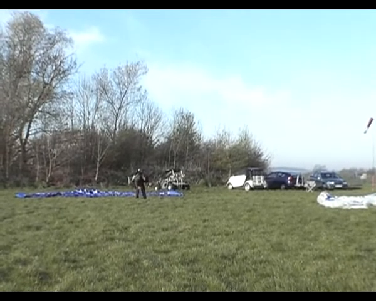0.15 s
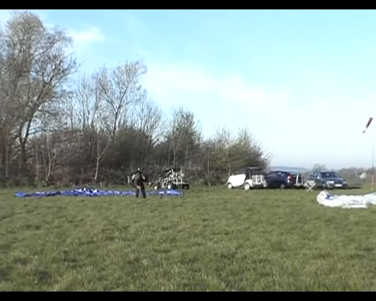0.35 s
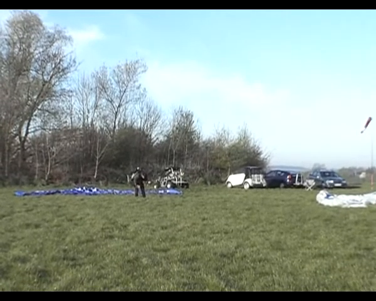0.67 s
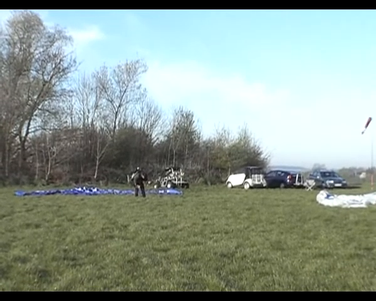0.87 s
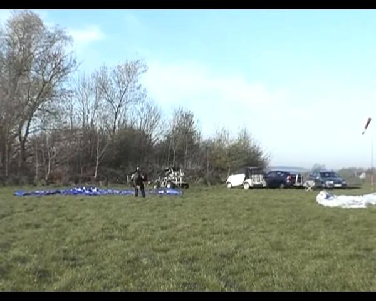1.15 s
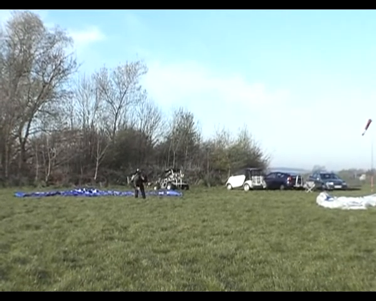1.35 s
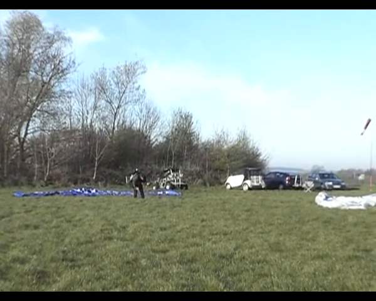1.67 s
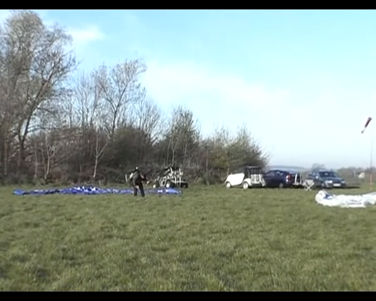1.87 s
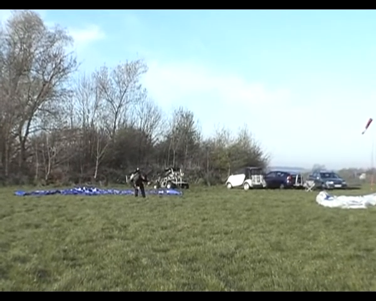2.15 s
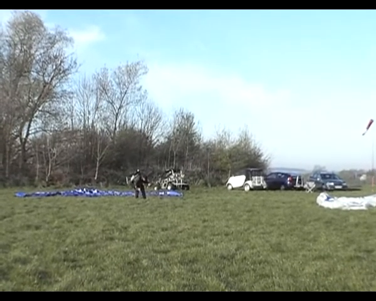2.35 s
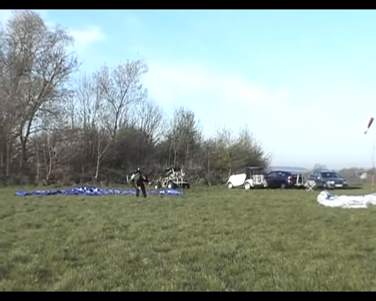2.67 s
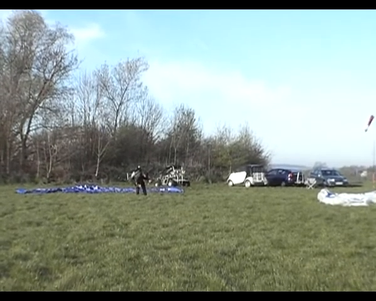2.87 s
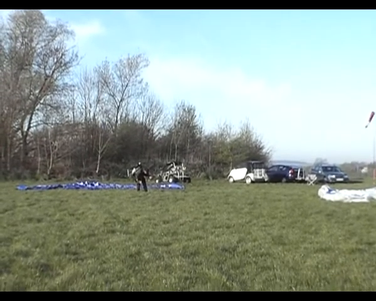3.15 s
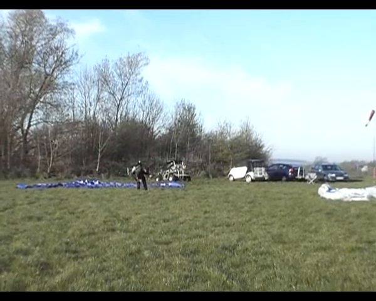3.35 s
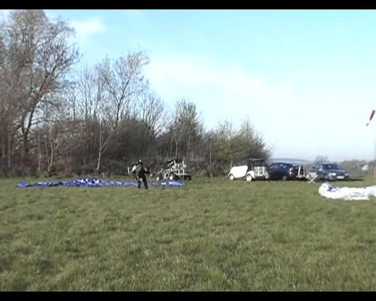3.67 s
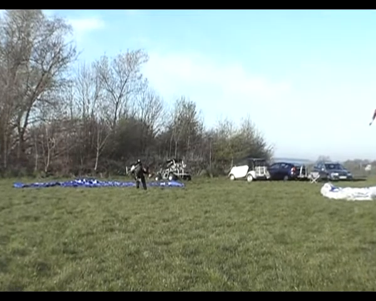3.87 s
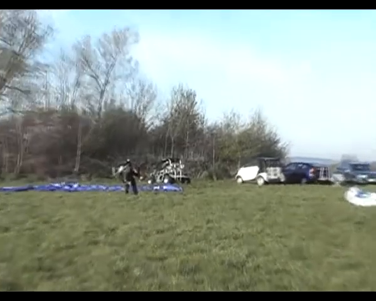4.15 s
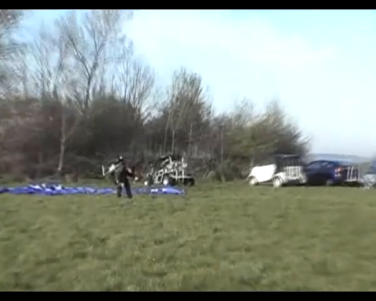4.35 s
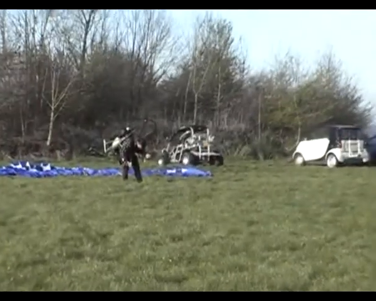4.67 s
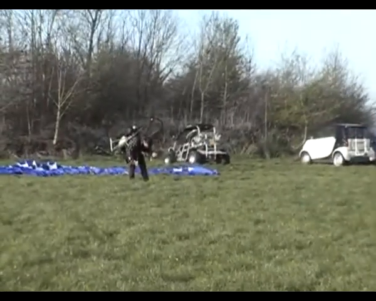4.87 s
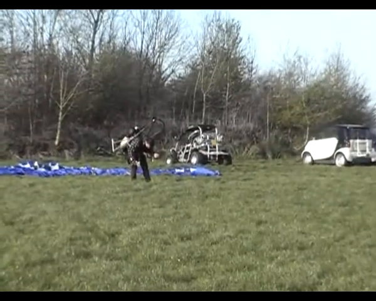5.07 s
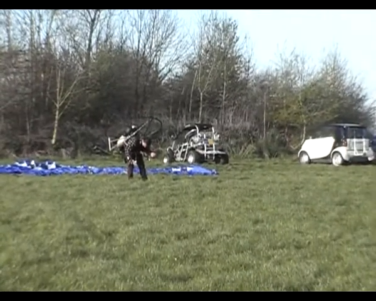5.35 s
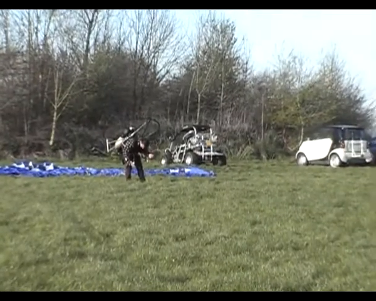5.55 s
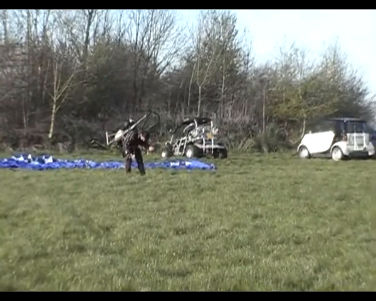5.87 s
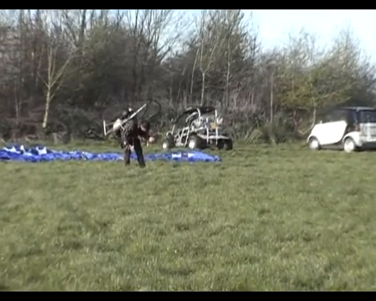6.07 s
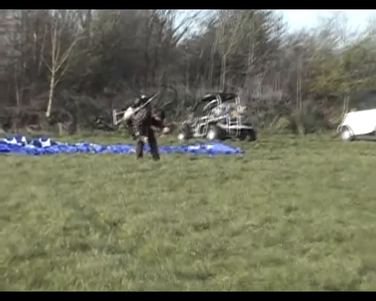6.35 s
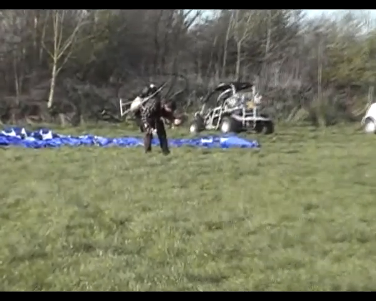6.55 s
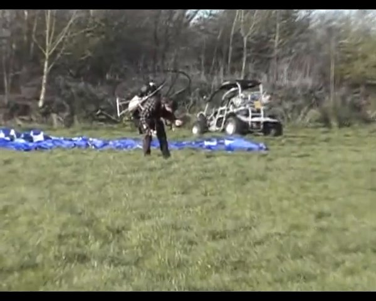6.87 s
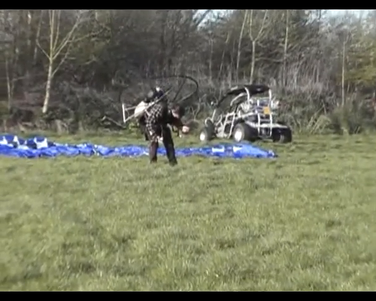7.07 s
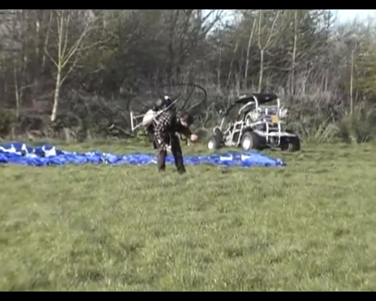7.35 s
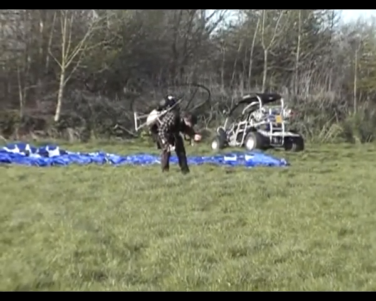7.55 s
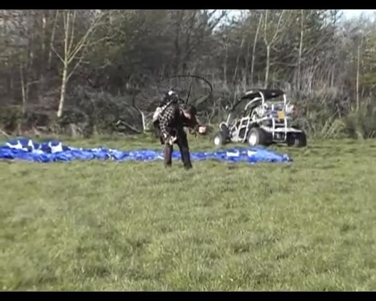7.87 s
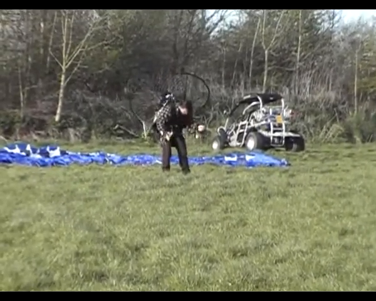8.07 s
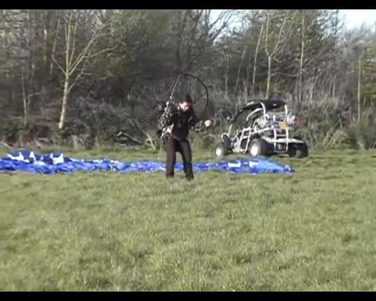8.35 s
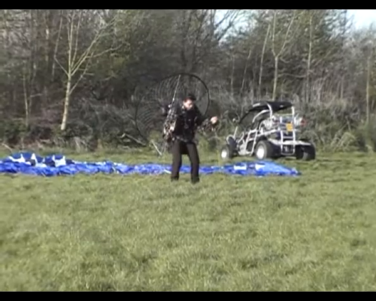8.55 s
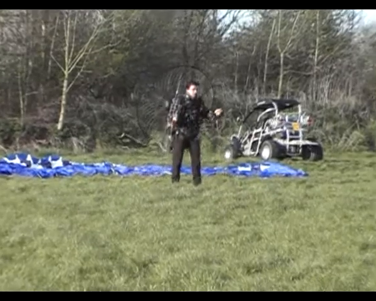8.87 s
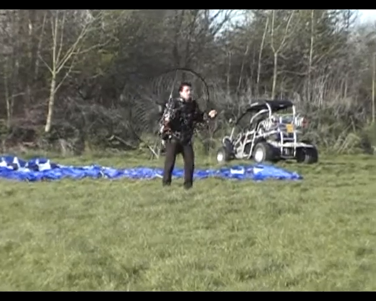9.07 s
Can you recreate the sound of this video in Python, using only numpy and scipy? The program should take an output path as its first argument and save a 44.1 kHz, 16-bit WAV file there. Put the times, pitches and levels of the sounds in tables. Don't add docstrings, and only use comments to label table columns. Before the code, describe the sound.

Far across an open field, a small two-stroke engine with a propeller buzzes nasally at part throttle, then revs up smoothly and holds a higher, harsher drone full of chopped air rush. It is cut abruptly; the note sinks with a short sigh, leaving propeller thrum and loose metallic clatter. A distant camera microphone catches faint wind, with slightly gritty treble.

```python
import sys
import numpy as np
from scipy import signal
from scipy.fft import rfft, irfft, next_fast_len
from scipy.io import wavfile
from scipy.ndimage import uniform_filter1d

SR = 44100
rng = np.random.default_rng(int(sys.argv[2]) if len(sys.argv) > 2 else 0)


def digitize_waveform(pressure):
    field = np.atleast_2d(pressure).T
    bounded = np.clip(field, -1, 1)
    quanta = np.round(bounded * 32767).astype(np.int16)
    wavfile.write(sys.argv[1], SR, quanta)


def voltage_ratio(decibels):
    exponent = np.asarray(decibels, float) / 20
    return 10 ** exponent


N = 406591
CUT_S = 7.83
PART_HZ, FULL_HZ = 118, 158
GEAR = .5555

# (time [s], firing rate [Hz])
CRANK_HZ = [(0.0, 109.6), (0.3, 113.0), (0.48, 115.5), (0.83, 116.9), (1.55, 118.9), (1.78, 119.3),
            (1.92, 122.8), (2.05, 127.5), (2.29, 138.7), (2.42, 143.8), (2.55, 147.5), (2.71, 150.1),
            (3.03, 153.5), (3.36, 155.5), (4.6, 157.2), (5.7, 158.1), (6.7, 158.5), (7.82, 158.5)]
# (multiple, part speed [dB], just after run-up [dB],
# pipe hot [dB])
FIRING_ORDERS = [(1, -44, -29.5, -24.5), (2, -21, -18, -17), (3, -23.5, -21.5, -20.5), (4, -30, -35, -23),
                 (5, -23, -16.5, -12.5), (6, -28, -13.5, -20.5), (7, -16.5, -13.5, -12.5),
                 (8, -26, -9.5, -6.5), (9, -21.5, -12, -15), (10, -18, -7, 0.5), (11, -19, -3.5, -2.5),
                 (12, -10, -5.5, -5.5), (13, -5.5, -27, -10.5), (14, 1, 1.5, 2.5), (15, -7, -10, -1.5),
                 (16, -13.5, -12, 0.2), (17, -17, -9, -8), (18, -7, -8, 2.5), (19, 1.2, -8.5, -11),
                 (20, -8, -13, -4), (21, -8.5, -15, -10), (22, -19, -9, -6), (23, -6.5, -5.5, -4.5),
                 (24, -6.5, -12, -12), (25, -7.5, -9.5, -12),
                 (29, -19, -13, -9.5), (30, -9, -24, -20), (31, -10.5, -19, -21), (32, -17, -10.5, -7.5),
               (33, -21, -8.5, -6), (35, -25, -8, -3.5), (36, -16, -7, -15), (37, -8, -14, -12),
               (38, -25, -6.5, -6), (40, -28, -8, -9.5)]
# (start [s], end [s], multiple of firing rate, level [dB])
FIN_WHISTLES = [
    (2.498, 4.2, 41, -49),
    (2.799, 3.6, 39, -28),
    (4.1, 6.5, 40, -24.5),
    (6.505, 7.85, 42, -25),
]
# (centre [Hz], width [Hz], level [dB])
SILENCER_MODES = [(296, 17, -14.5), (720, 120, -30.5), (1010, 110, -18.5), (1260, 57, -7.5),
                  (1750, 97, 0.5), (2152, 140, 0.5), (2840, 120, -1.5), (3700, 240, -5), (6300, 850, -13)]
# (centre [Hz], width [Hz], level [dB])
FRAME_MODES = [(1338, 195, 1), (1683, 250, 1), (2165, 175, 3.5), (2850, 400, -0.5), (3530, 700, -1),
               (6600, 950, -7.5)]
# (multiple, part speed [dB], full speed [dB], coasting [dB])
BLADE_HARMONICS = [(1, -17, -15, -21), (2, -0.5, -1, 0), (3, -1.5, -9, -1.5), (4, -7, -23, 1.5),
                   (6, -18, -19, -4)]
# (blade passes added, level [dB])
BLADE_BEATS = [(-2, -54), (-1, -47), (1, -49), (2, -47), (3, -50)]
# (frequency [Hz], density [dB])
BODY_SPECTRUM = [(410, -22.5), (700, -15), (785, -11), (1180, -7.5), (1540, -2.5), (1990, -3.5),
                 (2180, -3.5), (2480, -2.5), (2910, -2.5), (4000, -7), (5000, -18.5), (6500, -45),
                 (11000, -120)]
# (frequency [Hz], density [dB])
FULL_HISS_SPECTRUM = [(2350, -33.5), (4000, -6), (4380, -4), (5190, -2), (6520, 1), (8700, -14),
                      (10500, -15), (11700, -14.5), (12400, -105), (16100, -75), (22000, -120)]
# (frequency [Hz], density [dB])
PART_HISS_SPECTRUM = [(2350, -28), (4000, -2.5), (4360, -4), (5340, -4), (6130, 2.5), (7690, -6),
                      (11000, -19.5), (12200, -33), (12400, -59), (16100, -95), (22000, -120)]
# (frequency [Hz], density [dB])
RUMBLE_SPECTRUM = [(25, -44), (70, -18), (130, -28), (220, -7.5), (330, -8.5), (440, -15), (650, -11.5),
                   (900, -7.5), (1200, -23), (2000, -120)]
# (time [s], peak [dB], ring [Hz])
SLAPS = [(8.172, -7, 2770), (8.146, -3, 1750), (8.3123, -7, 4200), (8.3508, -13, 3680), (8.4076, -8, 5930),
         (8.4281, -3, 3760), (8.4715, -4.5, 3720), (8.5314, -12, 6470), (8.5433, -15, 3620),
         (8.5784, .6, 3700), (8.6281, -14, 3450), (8.6456, -11, 3360), (8.6695, -4, 3380),
         (8.706, -10.5, 2880), (8.7283, -8, 6560), (8.7484, -20, 3670), (8.7773, -15, 2690),
         (8.8187, -15, 2760), (8.8466, -6.5, 3940), (8.872, -10.5, 3770), (8.8831, -11, 5740),
         (8.8985, -12, 6350), (8.9364, -10, 2650), (8.9589, -19, 2880), (8.9903, -13, 2690),
         (9.0412, -14, 3610), (9.114, -8.5, 6200), (9.1445, -15, 5700), (9.1614, -12, 3720),
         (9.0716, -19, 4800)]
# (time [s], level [dB])
WIND_PUFFS = [(.25, -57), (1.49, -57), (2.26, -57), (2.5, -50), (2.85, -56), (3.33, -52), (3.9, -54),
              (4.42, -44), (4.62, -53), (5.07, -48), (5.55, -48), (5.9, -54), (6.3, -54), (6.6, -57),
              (7.12, -51), (7.34, -51), (7.57, -54), (7.8, -54)]
# (frequency [Hz], side level [dB])
STEREO_WIDTH = [(300, -61), (1140, -33.5), (2050, -23), (3690, -16), (5200, -15.5), (6650, -14),
                (8800, 1.5), (12000, -3)]
# (time [s], side share)
TREBLE_LEAN = [(0, -0.047), (1.2, -0.039), (2.2, 0.0018), (7.8, 0), (8.1, -0.043), (9.22, -0.048)]
# (start [s], end [s], treble edge lower by [Hz])
DULL_SPELLS = [
    (-1, 1.2, 1200),
    (2.75, 3.9, 1100),
    (4.5, 5.1, 700),
    (6.4, 8.3, 500),
]


def shaft():
    drag_per_s, friction_per_s2 = 1.2, .14
    after_s = np.maximum(np.arange(N) / SR - CUT_S, 0)
    slowing = 1 + drag_per_s * after_s + friction_per_s2 * after_s ** 2
    return curves(CRANK_HZ)[0] / slowing, after_s


def orders():
    at_26th_db = np.array([-14, -15.5, -24.5])
    fall_db_per_order = np.array([.9, -0.5, -1.3])
    listed = {round(k): levels for k, *levels in FIRING_ORDERS}
    plain = lambda k: at_26th_db - fall_db_per_order * (k - 26)
    return [(k, *listed.get(k, plain(k))) for k in range(1, 43)]


def engine():
    note_db, cold_loss_db, fall_db_per_s = -14, 2.5, 28
    t_s = np.arange(N) / SR
    hz, after_s = shaft()
    turn = 2 * np.pi * np.cumsum(hz) / SR + 0.0069 * wobble(40)
    colour_db = lambda f: 20 * np.log10(resonance(f, -45, SILENCER_MODES))

    coarse_hz, coarse_s = hz[::64], t_s[::64]
    part = np.clip((126 - coarse_hz) / 6, 0, 1) * np.clip((coarse_hz - 106) / 9, 0, 1)
    full = np.clip((coarse_hz - 143) / 10, 0, 1)
    hot = np.clip((coarse_s - 4.3) / 1.4, 0, 1)
    tone = np.zeros(N)
    for k, part_db, fresh_db, hot_db in orders():
        settled_db = (1 - hot) * (fresh_db - 1.5) + hot * (hot_db - 3.5)
        source_db = part * (part_db - colour_db(k * PART_HZ))
        source_db += full * (settled_db - colour_db(k * FULL_HZ))
        drift_db = .8 * wobble(1.5, len(coarse_s)) + 1.2 * wobble(14, len(coarse_s))
        gain = np.interp(t_s, coarse_s, voltage_ratio(source_db + colour_db(k * coarse_hz) + drift_db))
        tone += gain * np.sin(k * turn + rng.uniform(0, 2 * np.pi))

    level_db = note_db - cold_loss_db * np.clip(1 - t_s / 0.57, 0, 1) - fall_db_per_s * after_s
    tone = voltage_ratio(level_db) * unit(tone)
    for start_s, end_s, k, whistle_db in FIN_WHISTLES:
        fade = np.clip(np.minimum(t_s - start_s, end_s - t_s) / 0.15, 0, 1)
        tone += fade * voltage_ratio(whistle_db + 2.5 * wobble(23)) * np.sin(round(k) * turn)
    return tone, turn


def propeller(crank):
    thrum_db, driven_power, coast_lift_db, coast_power = -29, 4.6, 3, 5.3
    hz = GEAR * shaft()[0]
    turn = 2 * np.pi * np.cumsum(hz) / SR
    load = np.clip((hz - 66) / 20, 0, 1)
    running = np.arange(N) < CUT_S * SR
    speed_db = 20 * np.log10(hz / hz.max())
    coasting_db = np.minimum(coast_lift_db + coast_power * speed_db, 1.5)
    level_db = thrum_db + np.where(running, driven_power * speed_db, coasting_db)

    tone = np.zeros(N)
    for k, part_db, full_db, coast_db in BLADE_HARMONICS:
        slow_db = np.where(running, part_db, coast_db)
        harmonic_db = slow_db + load * (full_db - slow_db) + 0.83 * wobble(14)
        tone += voltage_ratio(harmonic_db) * np.sin(round(k) * turn + 0.11 * wobble(27))
    beats = np.zeros(N)
    for k, beat_db in BLADE_BEATS:
        beats += voltage_ratio(beat_db + 3.2 * wobble(6)) * np.sin(2 * crank + round(k) * turn)
    return np.sqrt(2) * voltage_ratio(level_db) * tone + (0.19 + load) * running * beats, turn


def air(crank, blades):
    body_db, hiss_db, rumble_db, load_gain_db = -12, -17, -36.5, 1.93
    body_power, hiss_power, rumble_power = 2.65, 3.1, 0.8
    held_hz = 68.2
    t_s = np.arange(N) / SR
    firing_hz, after_s = shaft()
    sink_db = (after_s > 0) * np.minimum(20 * np.log10(GEAR * firing_hz / held_hz), 0)
    sigh = np.exp(-((t_s - 7.92) / 0.079) ** 2)
    load = np.clip((t_s - 1.7) / 0.91, 0, 1)

    chop = 1.52 * np.cos(blades) + 1.36 * np.cos(2 * blades) + 0.37 * np.cos(crank)
    chop += 0.51 * wobble(30) + 0.6 * wobble(8)
    body = rush(lambda hz: voltage_ratio(along(BODY_SPECTRUM, hz)) * resonance(hz, -8), patchy_db=0.46)
    full_hiss = rush(lambda hz: voltage_ratio(along(FULL_HISS_SPECTRUM, hz)), patchy_db=1.0)
    part_hiss = rush(lambda hz: voltage_ratio(along(PART_HISS_SPECTRUM, hz)), patchy_db=0.5)
    hiss = np.sqrt(load) * full_hiss + np.sqrt(1 - load) * part_hiss
    rumble = rush(lambda hz: voltage_ratio(along(RUMBLE_SPECTRUM, hz)), patchy_db=-0.5)

    body_db = body_db + 0.8 * np.clip(after_s / .08, 0, 1)
    body_db = body_db + body_power * sink_db + 0.65 * wobble(1.494)
    hiss_db = hiss_db + load_gain_db * load + hiss_power * sink_db + 2.5 * sigh + 0.24 * wobble(1.2)
    rumble_db = rumble_db + load_gain_db * load + rumble_power * sink_db + 8 * sigh
    chopped_body = voltage_ratio(body_db - 2.5) * unit(voltage_ratio(0.31 * chop) * body)
    chopped_hiss = voltage_ratio(hiss_db) * unit(voltage_ratio(chop) * hiss)
    return chopped_body + chopped_hiss + voltage_ratio(rumble_db) * rumble


def clatter():
    out = np.zeros(N + SR)
    t_s = np.arange(SR // 10) / SR
    noises = rng.standard_normal((len(SLAPS), len(t_s)))
    for (slap_s, peak_db, ring_hz), noise in zip(SLAPS, noises):
        ring = np.sin(2 * np.pi * ring_hz * t_s) + 0.48 * np.sin(2 * np.pi * 1.07 * ring_hz * t_s)
        ring *= voltage_ratio(-60 * t_s / 0.019)
        crack = 1.05 * voltage_ratio(-60 * t_s / 0.014) * noise
        knock_db = -13.5 - 9.5 * (slap_s - 8.2) + 1.8 * noise[0] - peak_db
        knock = sum(voltage_ratio(db) * np.sin(2 * np.pi * hz * t_s) for hz, width_hz, db in FRAME_MODES[:3])
        knock = voltage_ratio(knock_db - 60 * t_s / 0.058) * knock
        onset = 1 - np.exp(-t_s / 0.00032)
        out[round(slap_s * SR):][:len(t_s)] += voltage_ratio(peak_db - 3.0) * (ring + crack + 0.5 * knock) * onset
    slaps = filtered(out[:N], lambda hz: voltage_ratio(along([(500, -20), (1200, 2), (7500, -3.5), (10000, -22)], hz)))

    rattle_db, rise_s, fall_db_per_s, ticks_per_s = -24.5, .17, 6, 140
    part_modes = [(1290, 210, 2.5), (2190, 140, -4), (3700, 400, -3.0), (5870, 530, -5)]  # Hz, width Hz, dB

    def parts(f):
        return sum(voltage_ratio(db) * 1j * f * w / (c * c - f * f + 1j * f * w) for c, w, db in part_modes)

    ticks = (rng.random(N) < ticks_per_s / SR) * rng.choice([-1, 1], N)
    ticks = ticks * voltage_ratio(3.5 * np.clip(rng.standard_normal(N), -3, 1.6))
    after_s = shaft()[1]
    level = voltage_ratio(rattle_db - fall_db_per_s * after_s) * np.clip(after_s / rise_s, 0, 1) ** 3
    return slaps + level * unit(filtered(ticks, parts))


def strut():
    t_s = np.arange(N) / SR
    fade = np.clip((t_s - 8.55) / .15, 0, 1)
    return voltage_ratio(-52 + 1.5 * wobble(8)) * fade * np.sin(2 * np.pi * 570 * t_s)


def wind():
    puff_s, calm_db = 0.07, -73
    t_s = np.linspace(0, N / SR, num=N // 64)
    level = voltage_ratio(calm_db + 4 * wobble(5, len(t_s)))
    level += sum(voltage_ratio(db) * np.exp(-((t_s - s) / puff_s) ** 2) for s, db in WIND_PUFFS)
    level = np.interp(np.arange(N) / SR, t_s, level * voltage_ratio(2.7 * wobble(12, len(t_s))))
    spectrum = [(15, -17), (30, 3), (60, 7), (110, -15), (200, -43)]  # Hz, dB
    return level * rush(lambda hz: voltage_ratio(along(spectrum, hz)), patchy_db=0.0)


def unit(x):
    return x / np.sqrt(np.mean(x ** 2) + 1e-20)


def along(points, hz):
    f, v = np.transpose(points)
    return np.interp(np.log(hz + 1), np.log(f + 1), v)


def curves(rows):
    s, *columns = np.transpose(rows)
    return [np.interp(np.arange(N) / SR, s, column) for column in columns]


def wobble(knots_per_s, count=N):
    knots = rng.standard_normal(int(N * 60 / SR))
    return np.interp(np.linspace(0, N * knots_per_s / SR, count), np.arange(len(knots)), knots)


def filtered(x, response):
    size = next_fast_len(N + SR // 4)
    return irfft(rfft(x, size) * response(np.fft.rfftfreq(size, 1 / SR)), size)[..., :N]


def resonance(hz, floor_db, modes=FRAME_MODES):
    power = sum(voltage_ratio(2 * db) / (1 + (2 * (hz - c) / w) ** 2) for c, w, db in modes)
    return np.sqrt(power + voltage_ratio(2 * floor_db))


def rush(response, patchy_db):
    z = signal.stft(rng.standard_normal(N), nperseg=256)[2]
    patches = uniform_filter1d(rng.standard_normal(z.shape), size=8, axis=0)
    patches = uniform_filter1d(patches, size=8, axis=1)
    noise = signal.istft(z * voltage_ratio(patchy_db * unit(patches)), nperseg=256)[1][:N]
    return unit(filtered(noise, response))


def scene():
    exhaust, crank = engine()
    thrum, blades = propeller(crank)
    sweep = .35 * np.cos(blades) + .25 * np.cos(2 * blades)
    exhaust = exhaust + filtered(exhaust * sweep, lambda hz: hz > 600)
    mid = exhaust + thrum + air(crank, blades) + clatter() + strut() + wind()

    scatter = rng.standard_normal(SR // 5) * voltage_ratio(-60 * np.arange(SR // 5) / 7000)
    scattered = signal.fftconvolve(mid, scatter / np.linalg.norm(scatter))[:N]
    side = filtered(scattered, lambda hz: voltage_ratio(along(STEREO_WIDTH, hz)))
    treble = filtered(mid, lambda hz: voltage_ratio(along([(500, 1), (3000, 3.6)], hz)))
    side += curves(TREBLE_LEAN)[0] * treble
    return np.array([mid + side, mid - side])


def thin_bands(x):
    edge_hz, edge_fall_hz_per_s = 11200, 1900
    hz, t_s, z = signal.stft([x[0] + x[1], x[0] - x[1]], SR, nperseg=2048)
    hz = hz[:, None]
    edge = edge_hz + 250 - edge_fall_hz_per_s * np.maximum(t_s - CUT_S - .2, 0)
    for start_s, end_s, lower_hz in DULL_SPELLS:
        edge -= lower_hz * np.clip(np.minimum(t_s - start_s, end_s - t_s) / .2, 0, 1)
    lost_share = np.clip((hz - 7700) / (edge - 7700), 0, 1) ** 1.2 * .88 + .12 * (hz > edge + 500)

    band = (hz[:, 0] // 110).astype(int)
    chance = rng.random((band.max() + 1, len(t_s) // 3 + 1))
    chance = np.repeat(chance, 3, axis=1)[band, :len(t_s)]

    size = uniform_filter1d(np.abs(z), size=3, axis=2) / (np.linalg.norm(z[0], axis=0) + 1e-9)
    mid_floor_db = np.where(hz < 200, -45, -48) - 4 * (hz < 85) * (hz > 50)
    mid_kept = (size[0] > voltage_ratio(mid_floor_db)) | (hz > 700)
    side_kept = (uniform_filter1d(size[1], size=4, axis=0) > voltage_ratio(-43.5)) | (hz > 5600)
    kept = z * (chance > lost_share) * [mid_kept, side_kept]
    mid, side = signal.istft(kept, SR, nperseg=2048)[1][:, :N] / 2
    return np.array([mid + side, mid - side])


def top_cut(x):
    return signal.sosfilt(signal.butter(12, 12570, fs=SR, output="sos"), x)


def record(dry):
    rounded = dry / (1 + np.abs(dry / .93) ** 6) ** (1 / 6)
    mix = thin_bands(rounded)
    return top_cut(mix)


dry = scene()
out = record(dry)
digitize_waveform(out)
```